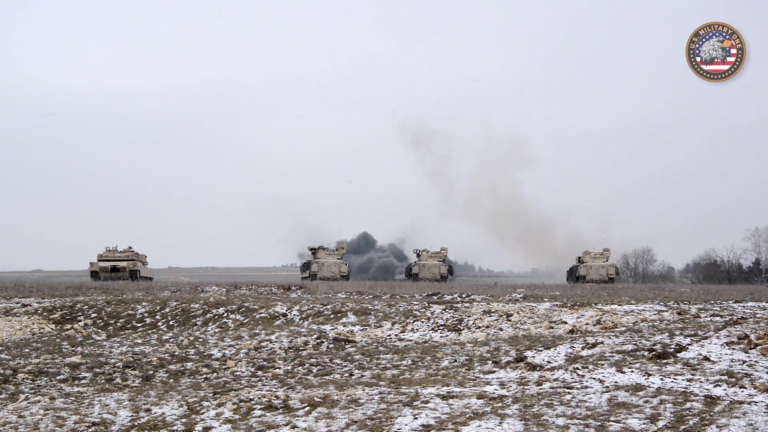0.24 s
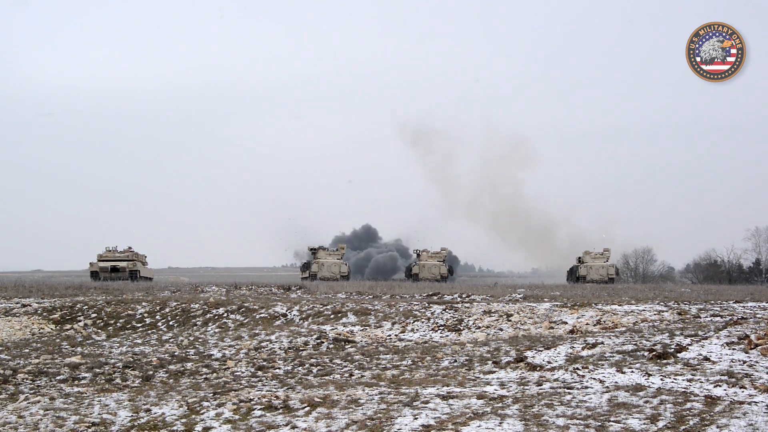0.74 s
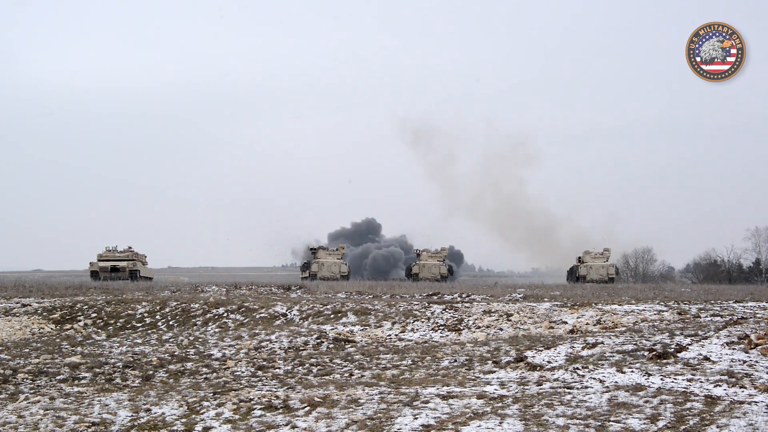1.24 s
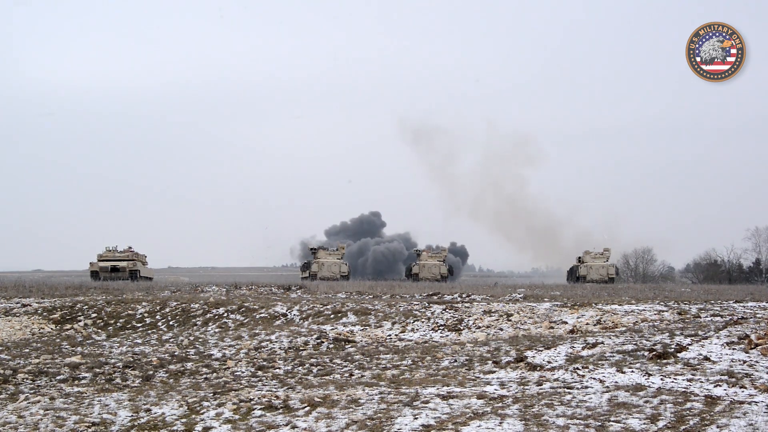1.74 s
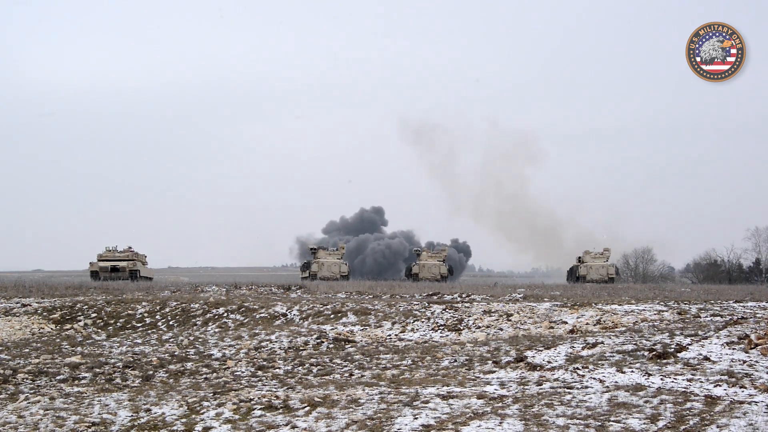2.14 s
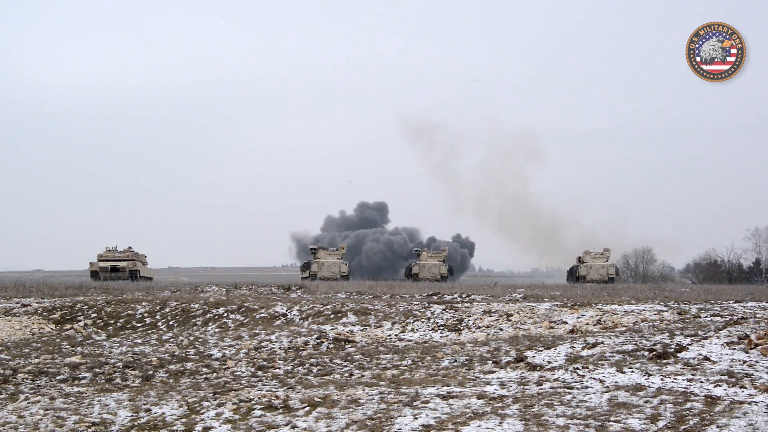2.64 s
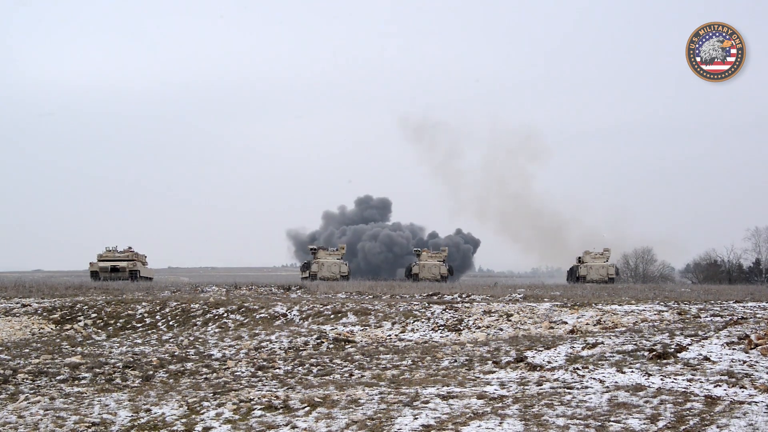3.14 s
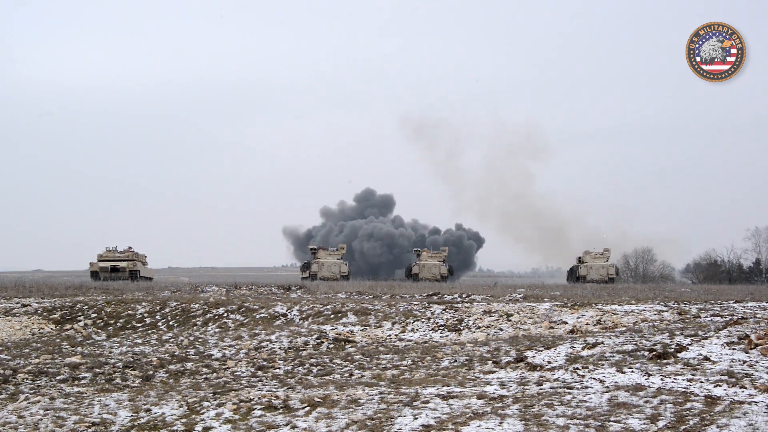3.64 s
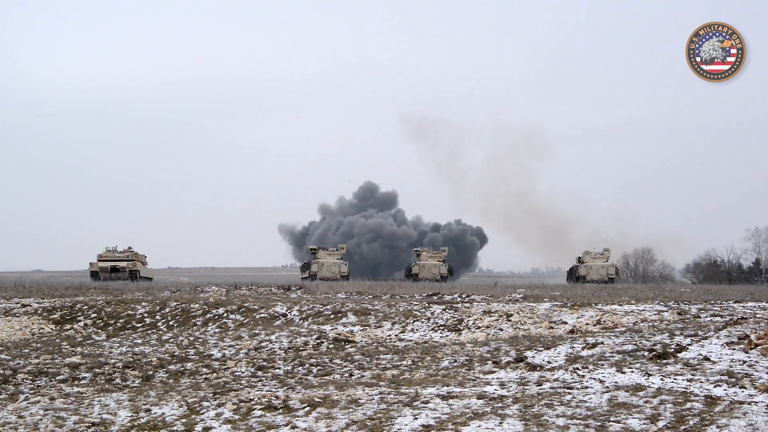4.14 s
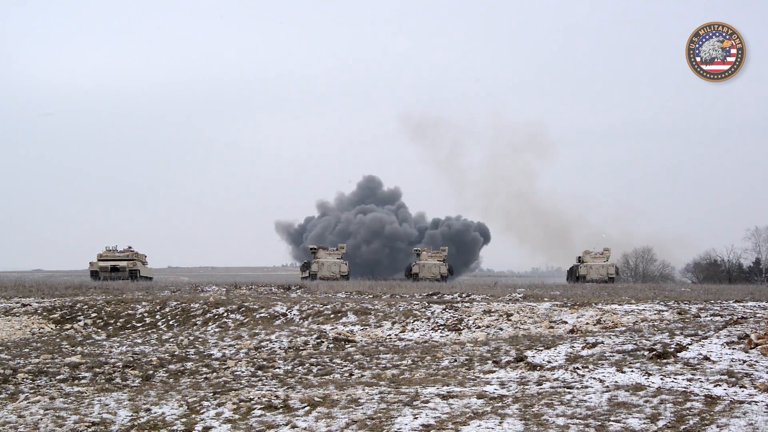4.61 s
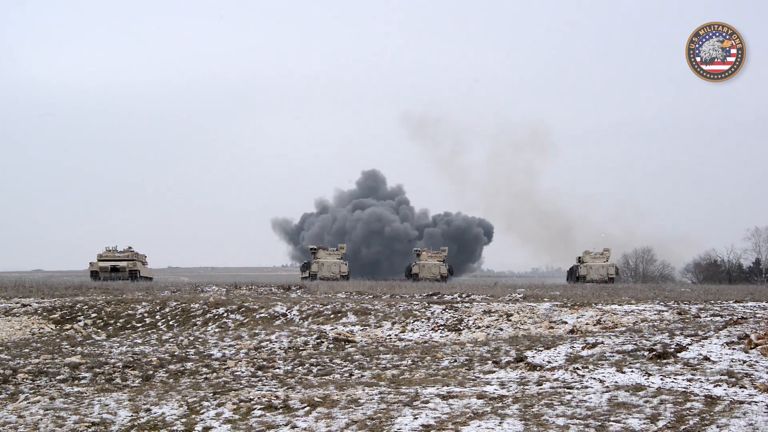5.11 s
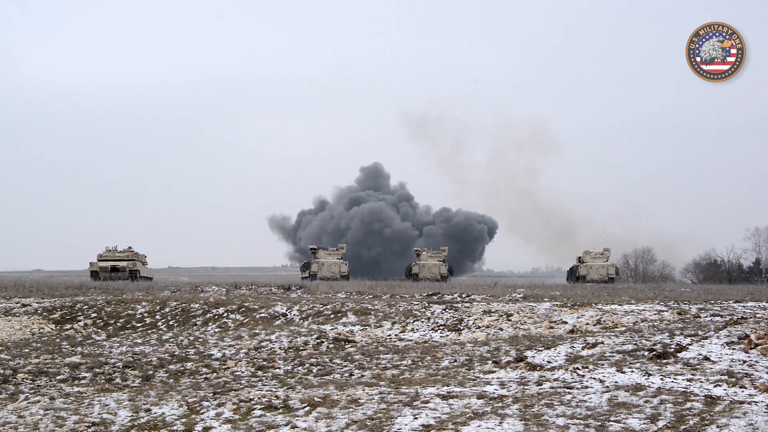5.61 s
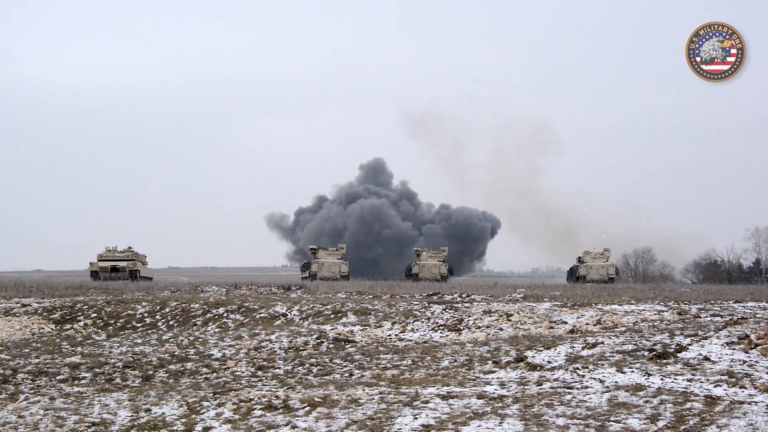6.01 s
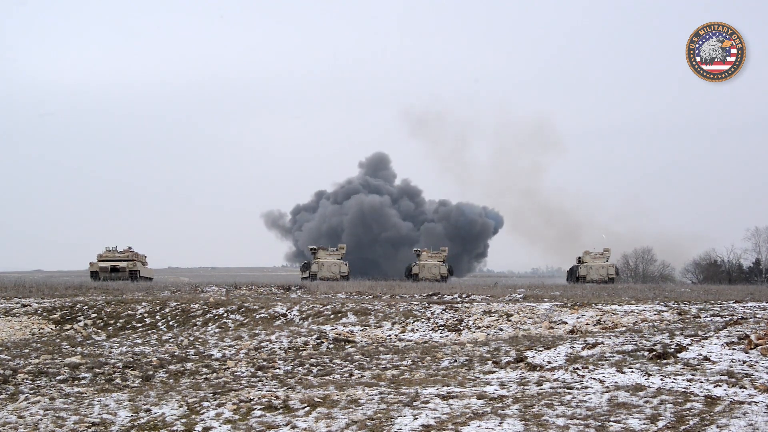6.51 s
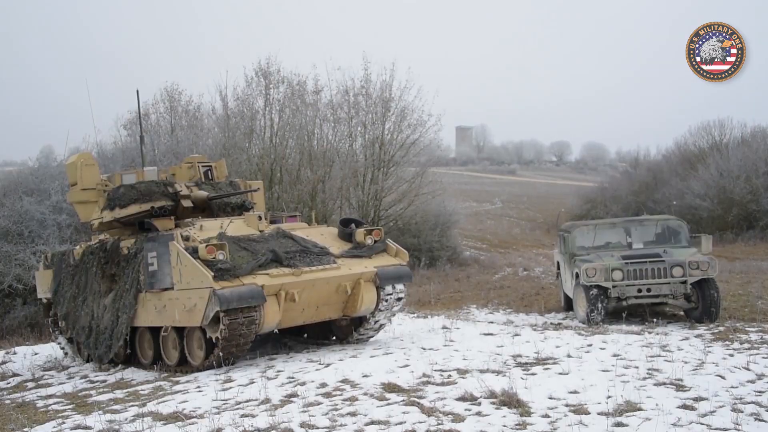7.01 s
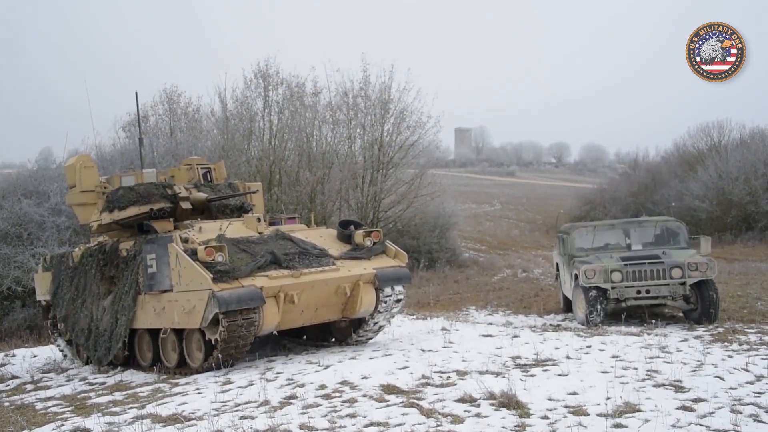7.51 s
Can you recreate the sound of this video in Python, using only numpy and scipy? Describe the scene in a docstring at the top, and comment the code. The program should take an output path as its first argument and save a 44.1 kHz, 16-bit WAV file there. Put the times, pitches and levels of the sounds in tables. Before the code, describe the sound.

On an open winter range, armoured vehicles idle with a soft rush, whirr and track chirps. Almost at once a tank gun fires, a tearing, clipped blast lasting a third of a second. Claps and booms return from tree lines, then a long roll fades unevenly over several seconds. The idling resurfaces, mostly left, until an abrupt cut to a very faint engine hum.

```python
"""Tank gun on an open range

A tank fires its main gun while armoured vehicles idle nearby: shaped noise, unsteady tones and track chirps.
Shock fronts, each a crack of noise and a slow pressure swing, overdrive the microphone for a third of a second.
The report returns as claps, booms and rolling noise from woods and hills.
Near the end the sound switches abruptly to a faint engine hum of steady lines, soft noise and brief squeaks."""
import sys
import numpy as np
from scipy import signal
from scipy.fft import rfft, irfft, next_fast_len
from scipy.io import wavfile
from scipy.ndimage import uniform_filter1d

SR = 44100
rng = np.random.default_rng(int(sys.argv[2]) if len(sys.argv) > 2 else 0)


def write(x):
    x = np.atleast_2d(x).T
    wavfile.write(sys.argv[1], SR, np.round(np.clip(x, -1, 1) * 32767).astype(np.int16))


N = 341775

# Every density is relative: the shaped noise is scaled again before its level is set.
SWITCH_S = 6.945  # the shot and vehicles give way to the faint hum

# Lines of the faint engine: frequency_hz, rms_level_db
HUM_LINES = [(109.6, -57), (147.5, -73), (206.3, -69.5), (216, -75), (253, -84), (331, -79), (586.8, -76),
             (992, -74)]
# Spectrum of the faint engine's machine noise: frequency_hz, density_db_per_hz
HUM_SPECTRUM = [(15, -73), (25, -41.5), (53, -29), (77, -23), (112, -25), (158, -15), (293, -22),
                (573, -19.5), (879, -19.5), (978, -16), (1500, -21.5), (1810, -18), (2560, -32.5),
                (10000, -47), (15000, -72)]
# Brief squeaks over the faint engine: crest_s, pitch_hz, rms_level_db
HUM_SQUEAKS = [(6.985, 1280, -66), (7.04, 1764, -62), (7.125, 998, -64), (7.2, 1760, -62),
               (7.365, 1754, -67), (7.59, 1004, -68), (7.71, 1007, -65)]

# Spectrum of the rush of fans and exhausts: frequency_hz, density_db_per_hz
IDLE_SPECTRUM = [(5, -68), (25, -18.5), (45, -3), (110, 0), (250, -2), (330, -7), (800, -5.5), (1100, -5),
                 (1800, -3.5), (2490, -14), (3500, -20.5), (5140, -25), (7500, -31), (12200, -35.5),
                 (15500, -52.5)]
# Balance of the idling vehicles: frequency_hz, left_minus_right_db
IDLE_BALANCE = [(60, -6), (110, -4.5), (200, 0.5), (380, 5), (700, 6.5), (1290, 5), (2380, 3.5), (4400, 7),
                (8120, 6.5), (15000, 0)]
# Correlation of the rush between the channels: frequency_hz, correlation (0 to 1)
IDLE_CORRELATION = [(60, 0.36), (180, 0.52), (550, 0.8), (1650, 0.85), (4970, 0.27), (15000, 0.16)]
# Exhaust note, fan and gear noises: centre_hz, width_hz, relative_level_db
ENGINE_BANDS = [(108.5, 5.6, -52), (158.5, 33, -60), (266.7, 24, -54), (441, 24, -56), (922, 50, -48.5),
                (893, 70, -49), (1458, 40, -55), (1684, 30, -57.5), (1740, 50, -53.5), (1841, 70, -46.5),
                (2070, 35, -58), (2802, 37, -66), (4060, 55, -72.5), (7150, 12, -80.5)]
# Steady gear tones: frequency_hz, rms_level_db
GEAR_LINES = [(868, -54.5), (936.7, -51), (1454, -55)]
# Two close notes of a fan's whirr: centre_hz, width_hz
WHIRR_NOTES = [(2598, 36), (2648, 60)]
# Single swell of the whirr: crest_s, half_length_s, level_db
WHIRR_SWELL = (4.6, 1.9, -55.5)
WHIRR_DB = -64  # steady part of the whirr
# Swells of the turbine whistle: crest_s, half_length_s, relative_level_db
WHISTLE_SWELLS = [(1.02, 0.05, -64), (1.56, 0.1, -71), (1.99, 0.06, -69), (2.41, 0.096, -63),
                  (2.89, 0.11, -61), (5.85, 0.08, -74), (6.48, 0.074, -63), (6.8, 0.16, -60)]
WHISTLE_HZ, WHISTLE_DB = 4966, -66.5  # relative level of its steady part
# Single swell of a second, thinner turbine line: crest_s, half_length_s, level_db
HIGH_WHISTLE_SWELL = (3.98, 0.28, -77)
HIGH_WHISTLE_HZ, HIGH_WHISTLE_DB = 10605, -83  # level of its steady part

# Spectrum of the running gear's clatter: frequency_hz, density_db_per_hz
RATTLE_SPECTRUM = [(300, -40), (1200, -7), (1850, -0.5), (2300, -6.5), (2700, -9), (3500, -18), (6000, -27),
                   (14000, -46)]
# Loudest chirps of steel tracks, before panning: centre_s, pitch_hz, peak_level_db
CHIRPS = [(4.07, 1710, -36), (5.07, 1770, -35), (5.73, 1700, -36), (6.14, 2050, -38), (6.145, 2300, -42),
          (6.28, 2020, -36), (6.37, 1670, -38)]

# Swells returned by stretches of terrain: crest_s, rise_s, fade_db_per_s, roll_db, relative_rumble_db,
# roll_hz, roll_half_width_octaves, rumble_hz, roll_left_minus_right_db; fade_db_per_s is the roll's
ROLLS = [(0.82, 0.13, 19.5, -19, -22.5, 723, 0.8, 123, -1.5),
         (1.219, 0.42, 22.5, -19, -27, 636, 0.6, 123, 1),
         (2.15, 0.35, 7.5, -32, -38.5, 801, 0.86, 111.2, -1),
         (2.65, 0.33, 12.5, -32.5, -35.5, 790, 0.59, 90, -3.5),
         (3.1, 0.085, 25, -38, -39.5, 640, 1, 105, -3), (4.33, 0.38, 9.5, -33, -34.5, 660, 0.88, 146, -5.5),
         (4.85, 0.48, 9.5, -36.5, -63, 574, 0.72, 135, 12),
         (5.44, 0.2, 13, -39.5, -39.5, 590, 0.62, 155, 6)]
RUMBLE_FADE = 0.52  # the rumble's rate of fading over the roll's
ROLL_SAG_OCT_PER_S = 0.074  # longer paths lose treble, so each swell sinks
# Low booms that come back with the nearer echoes: crest_s, half_length_s, level_db
BOOMS = [(0.927, 0.012, -13), (1.187, 0.016, -25), (1.595, 0.015, -22), (2.144, 0.032, -33),
         (2.77, 0.04, -41), (3.131, 0.025, -33)]
# Spectrum of the booms: frequency_hz, density_db_per_hz
BOOM_SPECTRUM = [(20, -48), (70, 4.5), (130, 2), (200, 6.5), (330, -27), (1000, -71)]
# Distinct echoes from tree lines: start_s, peak_db, length_s (to fade by 40 dB), centre_hz, treble_db
ECHOES = [(0.862, -9, 0.03, 695, -4), (0.915, -3.5, 0.018, 856, 6), (0.924, -1.5, 0.012, 720, 2.5),
          (0.959, -13, 0.04, 620, -5), (0.988, -12, 0.043, 700, -7), (1.087, -7.5, 0.045, 705, 5),
          (1.149, 1.5, 0.021, 610, 2), (1.164, -2, 0.028, 537, 9), (1.197, -9, 0.037, 550, 5),
          (1.221, -7, 0.018, 860, 1), (1.283, -14, 0.049, 604, -3), (1.299, -9.5, 0.05, 676, -14),
          (1.327, -18, 0.025, 626, 1), (1.352, -7, 0.024, 736, -8), (1.565, -16, 0.045, 646, 14),
          (1.654, -10.5, 0.042, 463, -3), (1.707, -19, 0.091, 553, 10), (1.896, -21, 0.039, 720, 2),
          (2.062, -20, 0.028, 784, 7), (2.097, -18.5, 0.04, 675, 10), (2.213, -19.5, 0.054, 835, -7),
          (2.305, -21.5, 0.091, 696, 2), (2.425, -20, 0.035, 750, 0), (2.559, -20, 0.059, 820, 2),
          (2.835, -25, 0.08, 740, 0), (2.926, -19.5, 0.032, 676, -2), (3.086, -21, 0.037, 603, 0),
          (3.13, -24.5, 0.059, 567, 0), (4.233, -19.5, 0.014, 600, 0), (4.325, -20.5, 0.028, 700, -2),
          (4.766, -27, 0.019, 680, 0), (5.406, -22.5, 0.04, 523, 0)]
# Spectrum of an echo centred on 600 Hz: frequency_hz, density_db_per_hz
ECHO_SPECTRUM = [(40, -29.5), (150, -4), (300, -27), (480, 10), (720, 5), (1200, -9.5), (2200, -30),
                 (4000, -46.5), (12000, -69)]
# Spectrum of the roar scattered by the open field: frequency_hz, density_db_per_hz
WASH_SPECTRUM = [(100, -48.5), (600, -11), (1100, 4), (1500, 0.5), (2000, -3), (2500, -18.5), (4000, -30),
                 (12000, -50.5)]
# Spectrum of the hiss behind the last front: frequency_hz, density_db_per_hz
HISS_SPECTRUM = [(300, -30), (1400, 5), (2200, -3.5), (3500, -15.5), (6000, -28.5), (15000, -43.5)]

# Surges of roar scattered by the nearby ground: start_s, hold_s, level_db, fade_db_per_s
ROARS = [(0.399, 0.011, 1.5, 499.5), (0.432, 0.11, -2, 86.5), (0.675, 0.041, -3.5, 381)]
ROAR_ATTACK_S = 0.0038
# Spectrum of the ground's roar: frequency_hz, density_db_per_hz
ROAR_SPECTRUM = [(5, -51), (22, -6), (45, 1), (90, -6.5), (160, 5.5), (280, -10.5), (480, -0.5),
                 (750, -1.5), (1200, -12.5), (2000, -21.5), (3500, -28), (8000, -44.5), (16000, -61.5)]
# Reflected shock fronts: start_s, relative_crack_db, relative_thump_db
SHOCKS = [(0.403, 0, -4), (0.4374, 9.5, -2), (0.4507, 7.5, 11.5), (0.466, 8, 8.5), (0.4768, 12.5, -1),
          (0.494, 4.5, -6), (0.503, 0, -3.5), (0.517, 14, -2.5), (0.5422, 13, 3.5), (0.5549, 12.5, 3),
          (0.567, 3, -7), (0.5765, 12.5, 9), (0.5947, 17, 8.5), (0.6092, 5.5, -7), (0.6283, 17.5, 5.5),
          (0.638, 1, 1), (0.659, -2, -11.5), (0.665, 16, 8), (0.6863, 7, -4.5), (0.7031, 6.5, 9.5),
          (0.715, 3, -11), (0.7263, 6, 0)]
# Spectrum of the reflected cracks: frequency_hz, density_db_per_hz
CRACK_SPECTRUM = [(5, -53), (100, -10), (600, 7), (1500, -0.5), (3000, -17), (5000, -16), (7000, -25.5),
                  (16000, -37)]
# Spectrum of the direct crack: frequency_hz, density_db_per_hz
DIRECT_SPECTRUM = [(20, -29), (600, 8), (2000, 0.5), (5000, -5.5), (8000, -18.5), (16000, -20.5)]
DIRECT_S = 0.3902  # the shock wave straight from the muzzle
THUMP_HZ = 100  # the swing of pressure behind every front
THUMP_LAG_S = 0.0004  # the swing reaches the right channel later

TOP_HZ = 15400  # upper limit of the microphone's band


def amp(db):
    """Logarithmic levels: decibels to amplitude gain."""
    return 10 ** (np.asarray(db) / 20)


def unit(x):
    """Normalisation: x at rms 1."""
    return x / np.sqrt(np.mean(x ** 2) + 1e-20)


def along(points, hz):
    """Interpolation: (frequency, value) points read on a logarithmic frequency axis."""
    f, v = np.transpose(points)
    return np.interp(np.log(hz + 1), np.log(f + 1), v)


def clock():
    """Sampling: the time of every sample, in seconds."""
    return np.arange(N) / SR


def wobble(rate):
    """Slow random modulation: a smooth curve through `rate` random knots a second."""
    knots = rng.standard_normal(int(N * rate / SR) + 4)
    fine = signal.resample_poly(knots, 8, 1)
    knot_places = np.linspace(0, len(knots), len(fine), endpoint=False)
    return np.interp(clock() * rate, knot_places, fine)


def swell(crest_s, half_s, db):
    """Gaussian envelope: a bell-shaped rise and fall of gain."""
    return amp(db) * np.exp(-((clock() - crest_s) / half_s) ** 2)


def filtered(x, response):
    """Linear filtering: the spectrum of x times a response of frequency."""
    m = next_fast_len(N + SR // 2)  # padded against wrap-around
    return irfft(rfft(x, m) * response(np.fft.rfftfreq(m, 1 / SR)), m)[..., :N]


def coloured(x, spectrum):
    """Spectral shaping: x through a table of levels, then set to rms 1."""
    return unit(filtered(x, lambda hz: amp(along(spectrum, hz))))


def spread(pair, side_db):
    """Sum and difference stereo: a common part and an opposed part at side_db."""
    side = amp(side_db) * pair[1]
    return np.array([pair[0] + side, pair[0] - side])


def noise(side_db):
    """White noise: equal power at all frequencies, partly shared by the channels."""
    return spread(rng.standard_normal((2, N)), side_db)


def band(hz, width):
    """Quadrature modulation: two random curves on one carrier make a fuzzy line of rms 1."""
    phase = 2 * np.pi * hz * clock()
    return unit(wobble(width) * np.cos(phase) + wobble(width) * np.sin(phase))


def tones(lines, drift, waver_db):
    """Line spectrum: sinusoids, each a little unsteady in pitch and level."""
    total = np.zeros(N)
    for hz, db in lines:
        pitch_hz = hz + drift * np.sqrt(hz) * wobble(25)
        gain = np.sqrt(2) * amp(db + waver_db * wobble(12))  # rms to peak
        total += gain * np.sin(2 * np.pi * np.cumsum(pitch_hz) / SR)
    return total


def hump(x, centre_hz, octaves, skirt_db):
    """Time-varying filtering: a moving band-pass with a thin skirt of treble; result at rms 1."""
    hz, frames, z = signal.stft(x, SR, nperseg=2048)
    centre = np.interp(frames, clock(), centre_hz)
    width = np.interp(frames, clock(), octaves)
    # the peak lies 0.15 octave below the nominal centre
    distance = np.log2((hz[:, None] + 1) / centre) + 0.15
    skirt = amp(skirt_db) / (1 + (hz[:, None] / 2200) ** 4)
    gain = np.exp(-(distance / width) ** 2 / 2) + skirt
    steady_power = z * gain / np.linalg.norm(gain, axis=0)
    return unit(signal.istft(steady_power, SR, nperseg=2048)[1][:, :N])


def faint_hum(air_db=-61.0, line_db=0, squeak_s=0.017):
    """Periodic firing gives steady lines over soft machine noise and a few phase-wavering squeaks."""
    air = amp(air_db) * coloured(noise(-22), HUM_SPECTRUM) * amp(0.767 * wobble(25))
    squeaks = np.zeros(N)
    for s, hz, db in HUM_SQUEAKS:
        phase = 2 * np.pi * hz * clock() + 0.6 * wobble(140)
        squeaks += swell(s, squeak_s, db) * np.sqrt(2) * np.sin(phase)
    engine = amp(line_db) * tones(HUM_LINES, drift=0.12, waver_db=0.5)
    return (air + squeaks + engine) * amp([[.5], [-.5]])


def idle_rush(level_db=-36):
    """Partial coherence: fan and exhaust noise whose channels correlate differently with frequency."""
    def half_angle(hz):
        """Coherence as an angle: correlation is the cosine of twice this angle."""
        return np.arccos(np.clip(along(IDLE_CORRELATION, hz), 0, 1)) / 2

    def weights(hz):
        """Power sharing: the common and opposed parts keep a constant total power."""
        return np.array([np.cos(half_angle(hz)), np.sin(half_angle(hz))])

    pair = filtered(rng.standard_normal((2, N)), weights)
    flutter_db = 0.41 * wobble(3.5) + 1.3 * wobble(120)
    return coloured(spread(pair, 0), IDLE_SPECTRUM) * amp(level_db + flutter_db)


def gear_noise(bands_db=-1, flutter_db=1.8):
    """Rotating machinery radiates narrow bands of noise and discrete gear tones."""
    bands = sum(amp(db + bands_db + flutter_db * wobble(12)) * band(hz, width)
                for hz, width, db in ENGINE_BANDS)
    return bands + tones(GEAR_LINES, drift=0.1, waver_db=2.5)


def fan_whirr():
    """Beating: two close, fuzzy notes waver together and swell once."""
    notes = unit(sum(amp(1.5 * wobble(30)) * band(hz, width) for hz, width in WHIRR_NOTES))
    return (amp(WHIRR_DB) + swell(*WHIRR_SWELL)) * notes


def turbine_whistle(whistle_db=-1):
    """Turbine tones: two thin lines, unsteady in pitch and level, under passing swells."""
    gain = amp(WHISTLE_DB) + sum(swell(*row) for row in WHISTLE_SWELLS)
    whistle = gain * tones([(WHISTLE_HZ, whistle_db)], drift=.07, waver_db=2.2)
    high_gain = amp(HIGH_WHISTLE_DB) + swell(*HIGH_WHISTLE_SWELL)
    return whistle + high_gain * tones([(HIGH_WHISTLE_HZ, 0)], drift=.04, waver_db=5.5)


def idling():
    """Superposition: rush, gears, whirr and whistle add, mostly from the left."""
    vehicles = idle_rush() + gear_noise() + fan_whirr() + turbine_whistle()
    return filtered(vehicles, lambda hz: amp(np.outer([1, -1], along(IDLE_BALANCE, hz)) / 2))


def rattle(level_db=-52, grow_db_per_s=0.33, clump_db=6.0):
    """Irregular impacts: running gear clatters in short uneven clumps, left of centre."""
    clatter = coloured(noise(-13.5), RATTLE_SPECTRUM)
    clumps = unit(amp(clump_db * wobble(70)) * clatter)
    return amp(level_db + grow_db_per_s * clock()) * clumps * amp([[2], [-2]])


def track_squeaks(count=130, level_db=-45, centre_hz=1780, scatter=0.12, life_s=0.016, size_db=3):
    """Gliding tones: steel tracks to the left chirp, a few clear notes among many weak ones."""
    t = np.arange(SR // 8) / SR
    t = t - t.mean()
    pitch, size = rng.standard_normal((count, 2)).T
    weak_hz = centre_hz * np.exp(scatter * pitch)
    weak = zip(rng.uniform(0, SWITCH_S, count), weak_hz, level_db + size_db * size)
    chirps = np.zeros(N + len(t))
    for s, hz, db in [*CHIRPS, *weak]:
        glide = 0.7 * rng.standard_normal() * t ** 2
        note = np.sin(2 * np.pi * hz * (t + glide)) * np.exp(-(t / life_s) ** 2)
        chirps[round(s * SR):][:len(t)] += amp(db) * note
    return chirps[len(t) // 2:][:N] * amp([[2], [-2]])


def terrain():
    """Energy summation: swells add in power, and the stronger ones set the pitch, width and side."""
    t = np.arange(0, N / SR, .005)
    crest, rise, fade, roll_db, rumble_db, roll_hz, octaves, rumble_hz, pan_db = np.transpose(ROLLS)[:, :, None]
    rising = np.exp(-(np.minimum(t - crest, 0) / rise) ** 2)
    after = np.maximum(t - crest, 0)
    roll = rising * amp(roll_db - fade * after) ** 2 + 1e-20
    rumble = rising * amp(rumble_db - RUMBLE_FADE * fade * after) ** 2 + 1e-20

    def blend(value, power):
        """Weighted mean: each swell counts by its power."""
        return (value * power).sum(0) / power.sum(0)

    sinking_hz = roll_hz * 2 ** (-ROLL_SAG_OCT_PER_S * after)
    controls = (10 * np.log10(roll.sum(0)), 10 * np.log10(rumble.sum(0)),
                blend(sinking_hz, roll), blend(octaves, roll), blend(pan_db, roll), blend(rumble_hz, rumble))
    return [np.interp(clock(), t, c) for c in controls]


def rolling_echo(skirt_db=-26, spiky_db=1.5, flutter_db=0.92, rumble_octaves=0.8, rumble_trim_db=-1):
    """Diffuse reflection: countless small arrivals from far terrain, as noise, form roll and rumble."""
    roll_db, rumble_db, roll_hz, width, pan_db, rumble_hz = terrain()
    arrivals = noise(-20.0) * amp(spiky_db * wobble(700))
    roll_gain = amp(roll_db + flutter_db * wobble(22) + np.outer([1, -1], pan_db) / 2)
    roll = hump(arrivals, roll_hz, width, skirt_db) * roll_gain
    rumble_gain = amp(rumble_db + rumble_trim_db + 0.52 * wobble(14))
    rumble = hump(noise(-9.5), rumble_hz, np.full(N, rumble_octaves), -72) * rumble_gain
    # the echo takes over as the blast dies
    return np.clip((clock() - .7) / 0.056, 0, 1) * (roll + rumble)


def booms():
    """Selective reflection: broad hillsides return only the bass of the report."""
    return sum(swell(*row) for row in BOOMS) * coloured(noise(-12.0), BOOM_SPECTRUM)


def tree_lines(level_db=0, rise_s=0.00091, smear_s_per_s=0.0017, treble_hz=1100):
    """Scattering: woodland edges return short claps, softer-edged the later they come."""
    t = np.arange(SR // 5) / SR
    hz = np.fft.rfftfreq(len(t), 1 / SR)
    shelf = np.clip(np.log2((hz + 1) / treble_hz), 0, 1)
    claps = np.zeros((2, N))
    for s, db, length, centre_hz, treble_db in ECHOES:
        shifted_hz = hz * 600 / centre_hz  # moves the 600 Hz spectrum to this centre
        colour = amp(along(ECHO_SPECTRUM, shifted_hz) + treble_db * shelf)
        white = spread(rng.standard_normal((2, len(t))), -17.5)
        scatter = irfft(rfft(white) * colour, len(t))
        attack_s = rise_s + smear_s_per_s * (s - ECHOES[0][0])
        clap = scatter * amp(-40 * t / length) * (1 - np.exp(-t / attack_s))
        claps[:, round(s * SR):][:, :len(t)] += amp(db + level_db) * clap / np.abs(clap).max()
    return claps


def field_wash(start_s=0.73, level_db=-22, fade_db_per_s=45, far_swell=(1.27, 0.24, -33), grain_db=2):
    """Surface scattering: a bright field roar fades fast, then swells once from the nearest woods."""
    t = clock() - start_s
    gain = (t > 0) * amp(level_db - fade_db_per_s * np.abs(t)) + swell(*far_swell)
    return gain * coloured(noise(-15) * amp(grain_db * wobble(500)), WASH_SPECTRUM)


def blast_tail(level_db=-22, fade_db_per_s=130):
    """Exponential decay: a bright hiss of scattered sound dies away behind the last front."""
    t = clock() - SHOCKS[-1][0]
    return (t > 0) * amp(level_db - fade_db_per_s * np.abs(t)) * coloured(noise(-11), HISS_SPECTRUM)


def ground_roar():
    """Incoherent addition: surges of scattered sound start quickly, hold, fade and add in power."""
    t = clock()
    power = np.zeros(N)
    for s, hold, db, fade in ROARS:
        attack = np.clip((t - s) / ROAR_ATTACK_S, 0, 1)
        power += (amp(db - fade * np.maximum(t - s - hold, 0)) * attack) ** 2
    return np.sqrt(power) * coloured(noise(-28), ROAR_SPECTRUM)


def crackle(count=60, level_db=-7, size_db=1.0, pulse_s=0.0005, front_s=0.00005):
    """Weak shocks: small steep fronts, each a push and a suction, snap at random times."""
    place, size, side = rng.random((count, 3)).T
    first_s, last_s = SHOCKS[0][0], SHOCKS[-1][0]
    starts_s = first_s + place * (last_s - first_s)
    levels_db = level_db - size_db * np.log(1 - size)  # a few are much stronger
    t = np.arange(SR // 200) / SR
    pulse = (1 - t / pulse_s) * np.exp(-t / pulse_s) * (1 - np.exp(-t / front_s))
    shocks = np.zeros((2, N))
    for s, db, pan_db in zip(starts_s, levels_db, 2 * side - 1):
        shocks[:, round(s * SR):][:, :len(t)] += amp([[db + pan_db], [db - pan_db]]) * pulse
    return shocks


def pressure_swing(t, crossing_s=0.00771, swing_s=0.0042):
    """Blast wave phases: overpressure, then an equal suction, in both channels."""
    u = t - crossing_s + THUMP_LAG_S * np.array([[.5], [-.5]])
    return -np.sin(2 * np.pi * THUMP_HZ * u) * np.exp(-(u / swing_s) ** 2)


def direct_shock(crack_db=14.0, crack_s=0.0009, thump_db=12):
    """Shock discontinuity: the first front strikes at once, bright, with a swing that overdrives the input."""
    t = np.maximum(clock() - DIRECT_S, 0)
    crack = amp(crack_db) * np.exp(-t / crack_s) * coloured(noise(-15.5), DIRECT_SPECTRUM)
    return (t > 0) * (crack + amp(thump_db) * pressure_swing(t))


def reflected_shocks(crack_db=-1, crack_s=0.0019, crack_rise_s=0.0011, crest_s=0.0015, ragged_db=3.0, thump_db=0):
    """Shock reflection: each front builds briefly, cracks and is followed by a slow pressure swing."""
    t = np.arange(-SR // 50, SR // 20) / SR
    cracks, thumps = np.zeros(N), np.zeros((2, N))
    burst = np.exp(np.minimum((t - crest_s) / crack_rise_s, (crest_s - t) / crack_s))
    swing = pressure_swing(t)
    for s, db, low_db in SHOCKS:
        start = round((s + t[0]) * SR)
        cracks[start:start + len(t)] += amp(db + crack_db) * burst
        thumps[:, start:start + len(t)] += amp(low_db + thump_db) * swing
    tearing = noise(-16.5) * amp(ragged_db * wobble(1500))
    return cracks * coloured(tearing, CRACK_SPECTRUM) + thumps


def blast():
    """Superposition: direct and reflected shocks add to the ground's roar and crackle."""
    return direct_shock() + reflected_shocks() + ground_roar() + crackle()


def scene():
    """Superposition: the shot adds to the idling vehicles, until the faint hum replaces both."""
    vehicles = idling() + rattle() + track_squeaks()
    returns = rolling_echo() + booms() + tree_lines() + field_wash() + blast_tail()
    return np.where(clock() < SWITCH_S, vehicles + returns + blast(), faint_hum())


def record(dry, top=0.73, hardness=5, fizz_db=-30):
    """Saturation: the overdriven input flattens peaks and fizzes while pinned; the band is limited."""
    clipped = dry / (1 + np.abs(dry / top) ** hardness) ** (1 / hardness)
    excess = np.clip(np.abs(dry) - top, 0, 3)
    pinned = np.abs(uniform_filter1d(excess, size=200, axis=1))
    fizz_spectrum = [(300, -3), (3000, 1.5), (8000, -2.0), (15000, -7.5)]  # frequency_hz, density_db_per_hz
    fizz = amp(fizz_db) * np.sqrt(pinned) * coloured(noise(0), fizz_spectrum)
    coupled = signal.lfilter(*signal.butter(1, 3, "high", fs=SR), clipped + fizz)  # 3 Hz high-pass
    return filtered(coupled, lambda hz: 1 / np.sqrt(1 + (hz / TOP_HZ) ** 200))


dry = scene()
out = record(dry)
write(out)
```